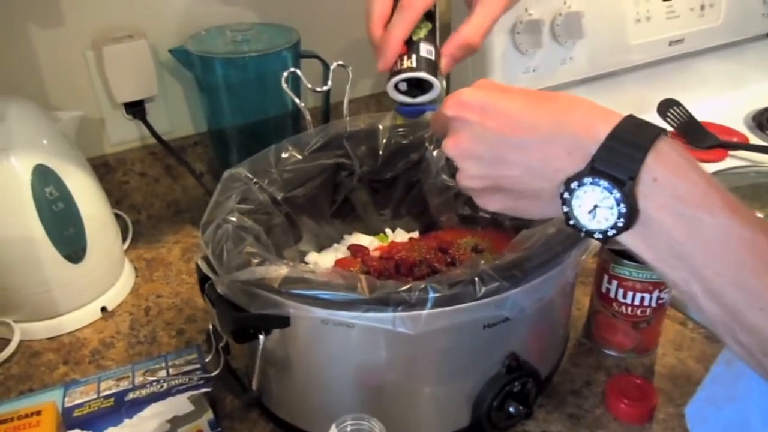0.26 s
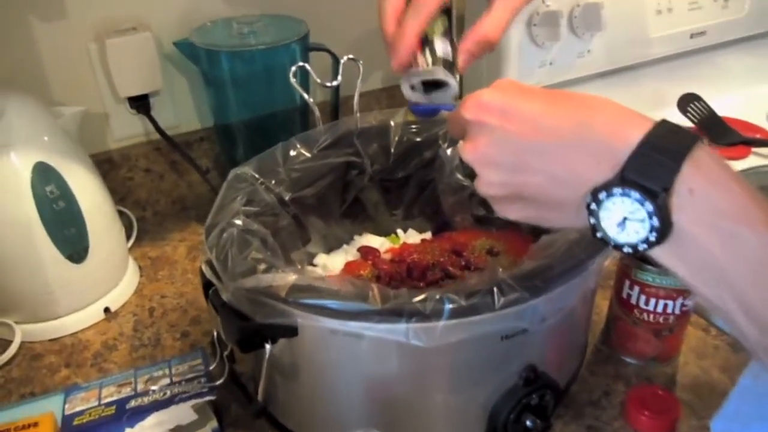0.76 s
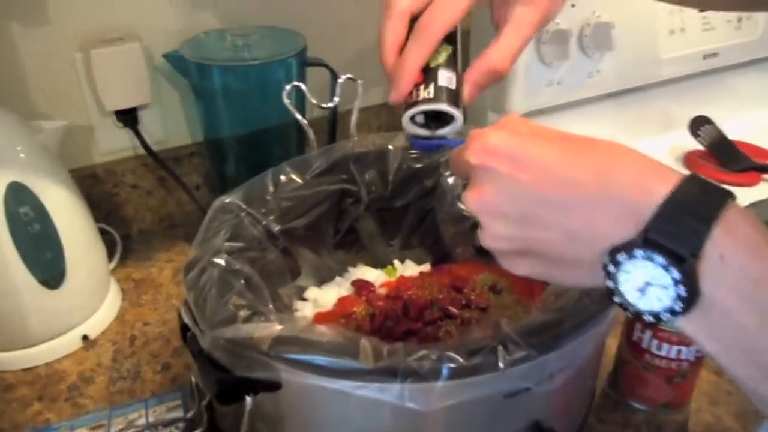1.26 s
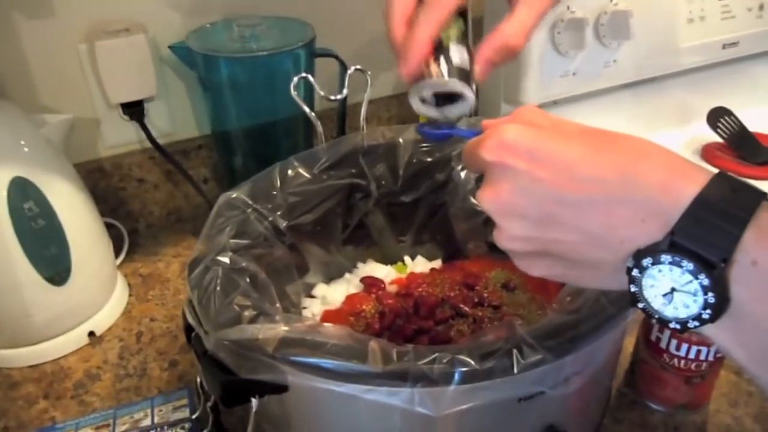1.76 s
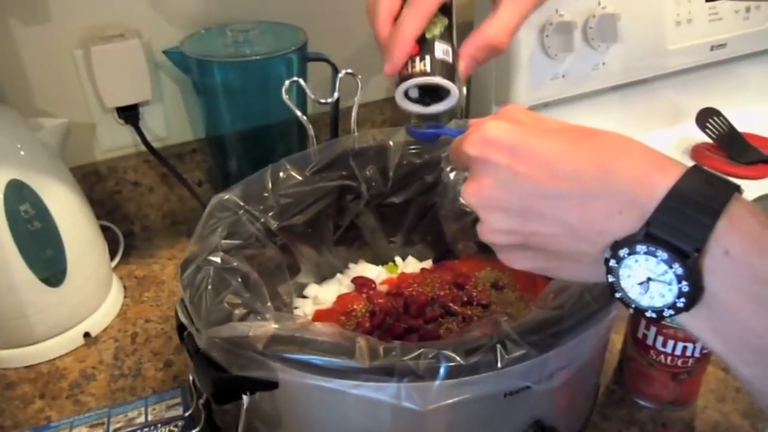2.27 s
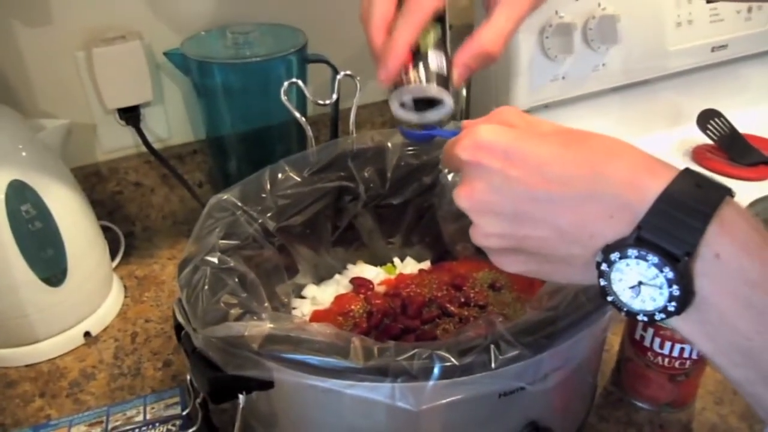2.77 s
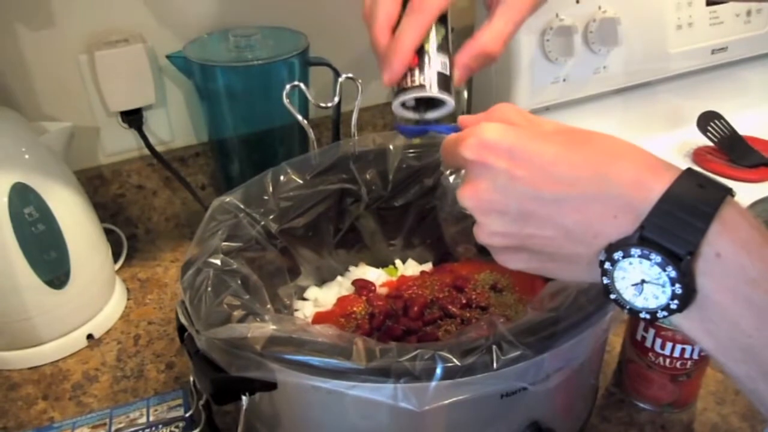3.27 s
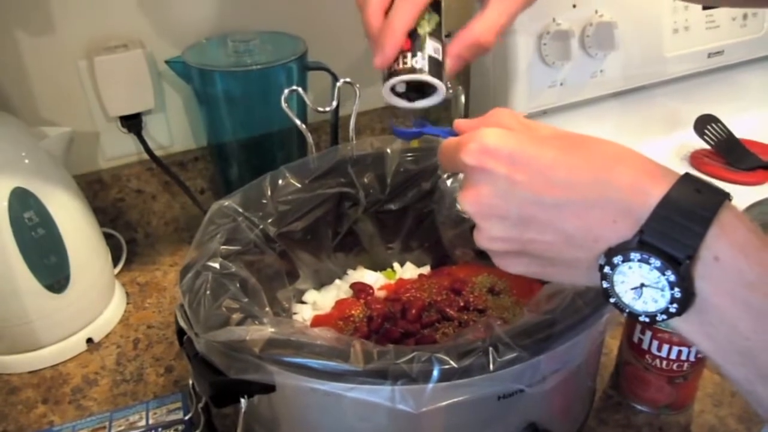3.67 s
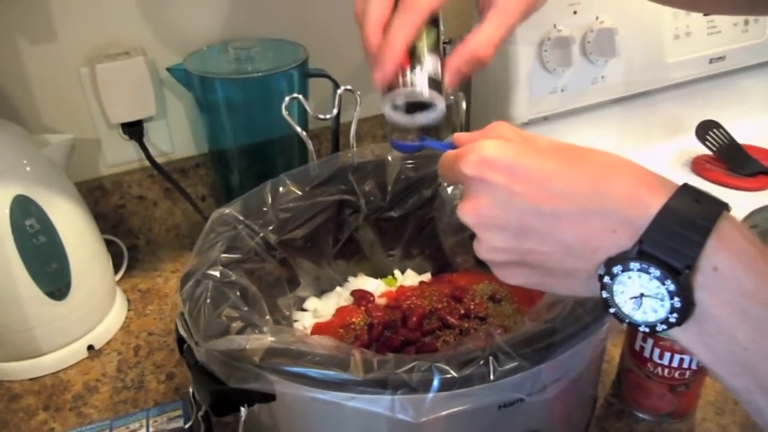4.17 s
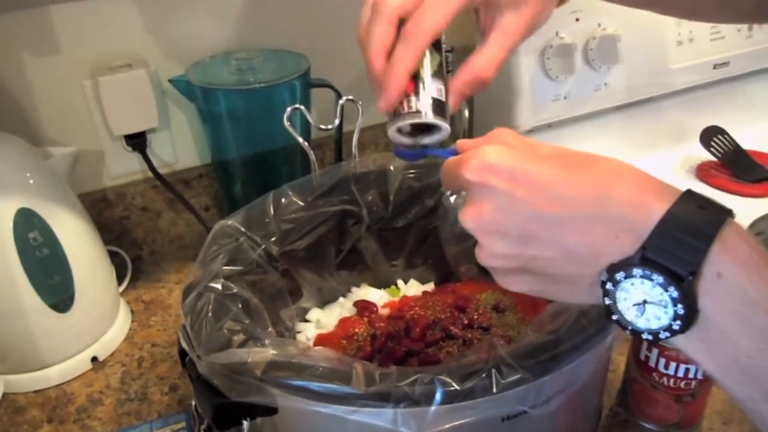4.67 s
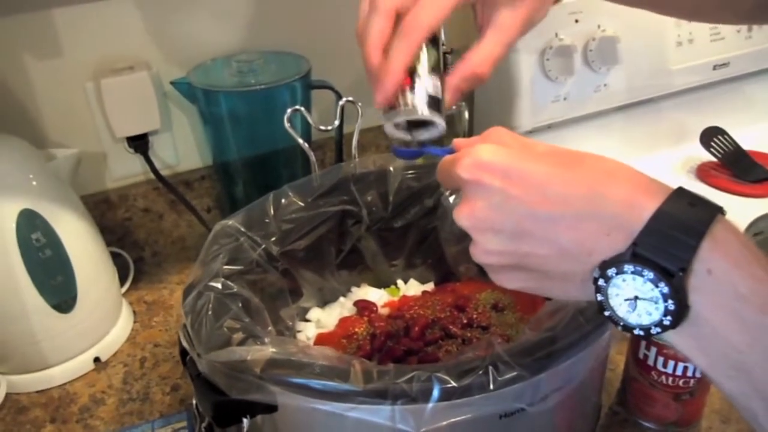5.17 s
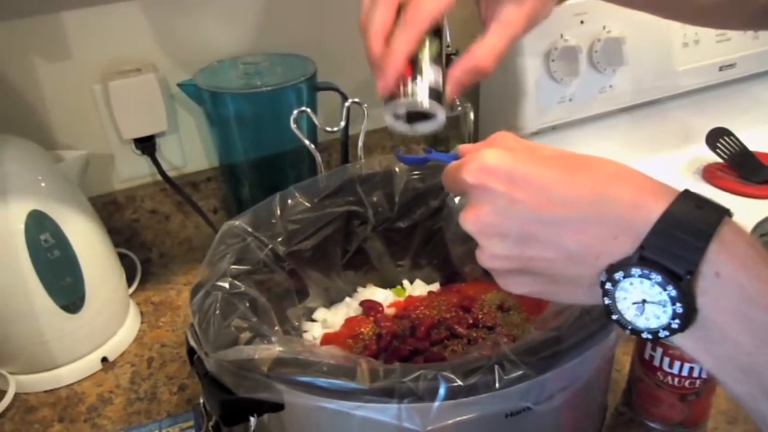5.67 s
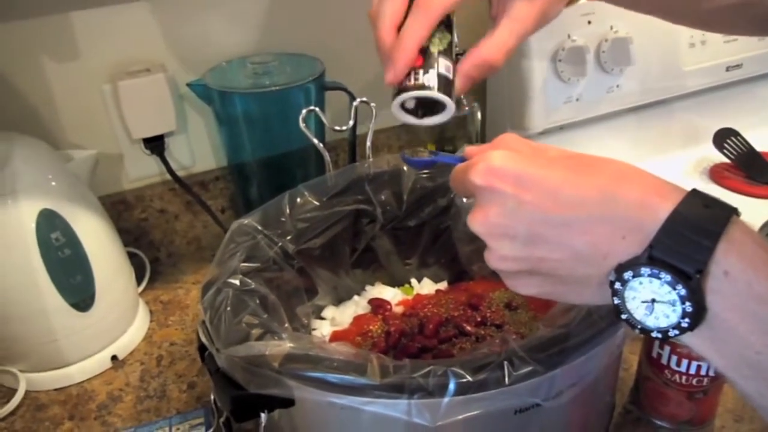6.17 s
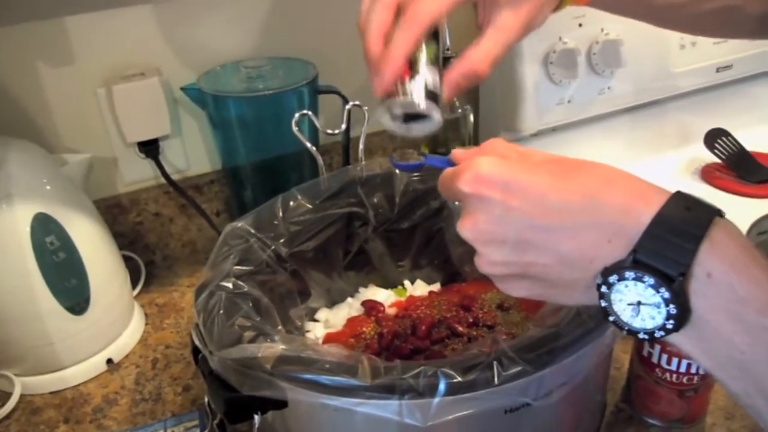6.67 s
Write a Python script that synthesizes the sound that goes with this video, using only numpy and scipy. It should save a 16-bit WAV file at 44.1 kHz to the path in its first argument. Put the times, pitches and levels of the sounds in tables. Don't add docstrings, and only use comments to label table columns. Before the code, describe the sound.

The tail of an earlier tap is just dying at 0 s. A small spice jar then strikes a measuring spoon at 0.1 s, and after a gap, at 0.5 s. From there the taps run evenly, roughly every 0.15 s, until about 4.85 s. They are short, hard, bright clicks with a tiny metallic-glassy ring, an immediate wall reflection and a brief room tail. Strength varies: the loudest falls near 0.95 s, with other strong ones near 2.0 and 3.9 s, and weaker ones after 4.2 s. Their tone grows somewhat brighter from about 3 s. After 4.9 s the tapping stops; only very faint, dry puffs of shifting powder come in irregular shakes until nearly 7 s. Throughout, a low fridge hum, soft broad hiss and a thin, very faint high whine stay steady. Close camera microphone in a small hard kitchen.

```python
import sys
import numpy as np
from scipy import signal
from scipy.io import wavfile

SR = 44100
rng = np.random.default_rng(int(sys.argv[2]) if len(sys.argv) > 2 else 0)


def wav_out(sig):
    wavfile.write(sys.argv[1], SR, np.round(np.clip(np.atleast_2d(sig).T, -1, 1) * 32767).astype(np.int16))


def invert_db(x):
    u = np.asarray(x, float) / 20
    return 10 ** u


N = 304443
LEAD = 4410

# start_s, level_db (peak), flatness_db (lift of the middle pitches)
TAPS = [(0.1098, -7, -3), (0.4981, -13.5, -3), (0.649, -8, -5), (0.7965, -11.5, -2.5), (0.9452, -3, -5),
        (1.1056, -14, -0.5), (1.257, -9, -4), (1.4194, -10, -3.5), (1.58, -13, 1.1), (1.728, -11.5, -1),
        (1.8863, -10.5, 2), (2.0307, -5.5, -0.5), (2.183, -10.5, 0.4), (2.3391, -9.5, -3),
        (2.4993, -10.5, -1), (2.6567, -12.5, -2.5), (2.8171, -12.5, -3.5), (2.9675, -13, -1.8),
        (3.1288, -13, 1.5), (3.2852, -12.5, 4), (3.446, -14, 1), (3.5935, -12, 2.5), (3.7531, -11.5, 2),
        (3.9073, -7, 2.5), (4.0726, -13, 3), (4.2369, -17.5, 4), (4.3927, -16, 3), (4.5456, -14, -1.5),
        (4.6931, -12, 0.7), (4.853, -15, 1.5)]
# level_db, flatness_db
EARLIER_TAP = (-5.5, 0.55)
COLOUR_HZ = [840, 1500, 2600, 4200, 7200, 11500]
# thud_db, low_body_db, shoulder_db, middle_db, upper_db, top_db
TAP_COLOUR = (-24, -23, -21, -15.5, -11.5, -22.5)
# time_s, thud_db, top_db
GRIP = [
    (0, 0, -1.5),
    (.6, 3.5, -3),
    (1.8, 2.5, 0.5),
    (2.5, 2, 0.5),
    (3.2, 1, 1.5),
    (3.9, -22, 1.5),
    (4.9, 9, 2.5),
]
# time_s, level_db (wall echo over straight sound)
FACING = [
    (0, 0),
    (.6, 2),
    (1.1, 2),
    (1.7, 1),
    (2, 0),
    (2.6, -2),
    (3.3, -1),
    (3.6, 1),
    (4.1, 0),
    (4.9, -2),
]
# pitch_hz, level_db, t60_s (time to fall 60 dB)
JAR_RINGS = [(840, -18, 0.0145), (1623, -22, 0.097), (1733, -25.5, 0.091), (1572, -14, 0.084),
             (1987, -8, 0.019), (2157, -25, 0.041), (1510, -12.5, 0.025), (1878, -8, 0.015),
             (2546, -3.5, 0.0076), (3150, -5.5, 0.011), (3210, 1, 0.008), (4120, 4.5, 0.0034),
             (4650, 1, 0.004), (5390, 0, 0.0032), (6280, -5.5, 0.0046), (6980, -5.5, 0.0058),
             (7780, -5, 0.0091), (8710, 1, 0.0055), (9540, -6.5, 0.0076), (10670, -4.5, 0.0072),
             (11380, -1.5, 0.0061), (12870, -5.5, 0.0076), (13900, -42.5, 0.002)]
# pitch_hz, width_hz, level_db
ALL_ROUND = [(1980, 750, 13.5), (3020, 740, 18), (4740, 2150, 15), (5780, 1000, 17.5), (7400, 1430, 13),
             (9720, 1900, 19), (11600, 2400, 17.5)]
# pitch_hz, width_hz, level_db
STRAIGHT = [
    [(2650, 400, -6), (11500, 5000, 3)],
    [(2650, 400, -6), (4700, 2000, 3), (7600, 1800, 8), (12200, 4500, -13)],
]
# pitch_hz, width_hz, level_db
OFF_WALL = [
    [(2200, 250, -6), (3600, 1300, -6), (6100, 400, -7), (7000, 700, 2), (8400, 600, -5), (9400, 700, 9),
     (11800, 3000, 3), (14800, 1500, -9)],
    [(2200, 250, -6), (3300, 900, -7), (6100, 300, -6), (7400, 1500, 11), (8500, 600, -11),
     (13000, 5000, -16)],
]
# pitch_hz, width_hz, level_db
DIFFUSE = [
    [(3670, 960, -0.5), (12700, 2200, -3)],
    [(3800, 3400, -0.5), (7200, 2200, 6), (11800, 7100, -22)],
]
# pitch_hz, width_hz, level_db
ROOM_DIP = [(1960, 160, -6), (1500, 200, -6)]
WALL_MS = [2.25, 2.27]
# delay_ms, left_db, right_db
ECHOES = [
    (3.9, -15, -13),
    (8.9, -16, -14),
    (9.9, -19, -22),
    (13.0, -24, -26),
    (18.5, -18, -21),
]
# pitch_hz, t60_s
ROOM_T60 = [(700, 0.043), (1850, 0.056), (4880, 0.21), (12900, 0.13)]
# pitch_hz, likeness (1 = the same)
ROOM_LIKENESS = [(600, 0.9), (2500, 1), (5000, 0.98), (9000, 0.07)]
# pitch_hz, level_db (per Hz)
HISS = [(14, -0.5), (30, -2), (60, -5), (100, -7), (200, -9), (400, -13.5), (800, -19), (1500, -22),
        (3000, -26.5), (5500, -29), (8000, -27), (11000, -31.5), (14500, -32)]
# pitch_hz, likeness (1 = the same)
HISS_LIKENESS = [(60, 0.94), (130, 0.84), (290, 0.78), (640, 0.39), (1410, 0.4), (3100, -0.14),
                 (6820, 0.056), (15000, 0.0078)]
# pitch_hz, level_db (left over right)
HISS_LEANING = [(300, 0), (1500, -0.5), (2800, -2.5), (4500, 1.5), (7500, -4), (10000, 1), (14000, -1)]
# pitch_hz, width_hz, left_db, right_db
MOTOR = [(121.8, 28, -63.5, -62.5), (30, 35, -63, -65), (801, 46, -67.5, -81), (1384, 154, -72.5, -67.5),
         (2432, 150, -65, -74.5), (2787, 160, -65, -93), (3290, 160, -68, -76), (3700, 240, -69, -70.5),
         (4800, 510, -96, -70.5)]
# sideband (steps of the frame rate), left_db, right_db
WHINE = [(-5, -92, -85), (-3, -84, -76), (-1, -79, -60), (0, -68, -70), (1, -80, -59), (3, -89, -70),
         (5, -92, -77), (7, -94, -80)]
# start_s, level_db (peak)
SHIFTS = [(0.314, -36.5), (0.38, -35), (1.4947, -36.5), (3.519, -36), (5.145, -44), (5.2974, -45),
          (5.6194, -49), (5.7744, -49), (6.1994, -48), (6.238, -42), (6.3994, -49), (6.5594, -56),
          (6.6694, -49), (6.714, -40.5), (6.865, -44)]


def at_hz(points, hz):
    pitch_hz, value = np.array(points).T
    return np.interp(np.log(hz), np.log(pitch_hz), value)


def rms_one(x):
    return x / np.sqrt(np.mean(x ** 2))


def ring(clicks, hz, t60):
    r = invert_db(-60 / (t60 * SR))
    w = 2 * np.pi * hz / SR
    return signal.lfilter([0, np.sin(w)], [1, -2 * r * np.cos(w), r * r], clicks + 1e-18)


def resonance(x, hz, width_hz):
    r = np.exp(-np.pi * width_hz / SR)
    w = 2 * np.pi * hz / SR
    return signal.lfilter([(1 - r * r) / 2, 0, (r * r - 1) / 2], [1, -2 * r * np.cos(w), r * r], x)


def coloured(x, peaks):
    for hz, width_hz, db in peaks:
        x = x + (invert_db(db) - 1) * resonance(x, hz, width_hz)
    return x


def bands(size, likeness):
    white = rng.standard_normal((2, 2, size))
    edges = 14 * 2 ** np.arange(0, 10.4, 1 / 3)
    for k, (low, high) in enumerate(zip(edges, edges[1:])):
        band_pass = signal.butter(2, [low, high], "band", fs=SR, output="sos")
        mid, side = signal.sosfilt(band_pass, white[k % 2])
        centre = np.sqrt(low * high)
        alike = np.clip(at_hz(likeness, centre), -1, 1)
        yield centre, np.sqrt(1 + alike) * mid + np.sqrt(1 - alike) * side * [[1], [-1]]


def quiet_cut(x):
    return signal.sosfilt(signal.ellip(10, .3, 70, 14200, fs=SR, output="sos"), x)


def tap_colours(taps):
    s, peak_db, flat_db = taps.T
    lag_db = 0.55 * (-11.5 - peak_db)
    at_s, thud_db, top_db = np.transpose(GRIP)
    thud_lift = np.interp(s, at_s, thud_db)
    top_lift = np.interp(s, at_s, top_db)
    return np.transpose([thud_lift, lag_db, lag_db / 2, flat_db, 0 * s, top_lift]) + TAP_COLOUR


def jar():
    contact_s, scatter_db = .00004, 1.3
    rung = 240000
    taps = np.array([(-.045, *EARLIER_TAP)] + list(TAPS))
    at = np.round(taps[:, 0] * SR).astype(int) + LEAD
    out = np.zeros((3, N + LEAD))
    wall_db = np.interp(taps[:, 0], *np.transpose(FACING))
    colours = tap_colours(taps)
    scatter = rng.standard_normal((len(taps), 3, len(JAR_RINGS)))

    def strength_db(hz):
        return taps[:, 1] + [np.interp(np.log(hz), np.log(COLOUR_HZ), colour) for colour in colours]

    for k, (hz, db, t60) in enumerate(JAR_RINGS):
        late = at + np.round(np.abs(scatter[:, 2, k]) * contact_s * SR).astype(int)
        level_db = strength_db(hz) + db
        clicks = np.zeros((2 + (t60 > .015), rung))
        clicks[0, late] = invert_db(level_db + scatter_db * scatter[:, 0, k] - wall_db / 2)
        clicks[1, late] = invert_db(level_db + scatter_db * scatter[:, 1, k] + wall_db / 2)
        clicks[2:, at] = invert_db(level_db)
        out[:len(clicks), :rung] += (-1) ** k * ring(clicks, hz, t60)
    for k, (hz, width_hz, db) in enumerate(ALL_ROUND):
        clicks = np.full(rung, 1e-18)
        clicks[at] = invert_db(strength_db(hz) + db)
        out[2, :rung] += (-1) ** k * resonance(clicks, hz, width_hz)
    return invert_db(5) * signal.sosfilt(signal.butter(2, 750, "high", fs=SR, output="sos"), out)


def kitchen():
    t = np.arange(round(.4 * SR)) / SR
    tail = 0
    for hz, band in bands(len(t), ROOM_LIKENESS):
        early = invert_db(-25 - 60 * t / 0.081)
        main = invert_db(-32.5 - 60 * t / at_hz(ROOM_T60, hz))
        late = invert_db(-40.5 - 60 * t / 0.6)
        tail = tail + band * (early + main + late)
    tail = tail * np.clip(t / 0.0025, 0, 1)
    for ms, left_db, right_db in ECHOES:
        tail[:, round(ms * SR / 1000)] += invert_db(np.array([left_db, right_db]))
    return quiet_cut(tail)


def background():
    hiss = 0
    for hz, band in bands(N + SR, HISS_LIKENESS):
        lean_db = at_hz(HISS_LEANING, hz) * np.array([[.5], [-.5]])
        hiss = hiss + invert_db(at_hz(HISS, hz) + lean_db) * band[:, SR:]
    out = invert_db(-48) * rms_one(hiss)
    for hz, width_hz, left_db, right_db in MOTOR:
        hum = resonance(rng.standard_normal(N + SR), hz, width_hz)
        hum = resonance(hum, hz, width_hz)[SR:]
        out += invert_db(np.array([[left_db], [right_db]])) * rms_one(hum)
    return out


def mains_hum():
    return np.sqrt(2) * invert_db(-56.5) * np.sin(2 * np.pi * 120 * np.arange(N) / SR)


def whine():
    line_hz, frame_hz, flip_s = 7867.13, 29.97, .0012
    steady_turn, port_turn = 2.6, 2.75
    t, out = np.arange(N) / SR, 0
    for order, left_db, right_db in WHINE:
        turn = 2 * np.pi * (line_hz * t + order * frame_hz * (t - flip_s))
        turn += np.sign(order) * np.pi / 2 if order else steady_turn
        level = np.sqrt(2) * invert_db(np.array([[left_db], [right_db]]))
        out = out + level * np.cos(turn + [[port_turn], [0]])
    return out


def powder():
    pushes = np.zeros(N + LEAD)
    pushes[[round(s * SR) + LEAD for s, db in SHIFTS]] = invert_db(np.array(SHIFTS)[:, 1] - 39.5)
    rush = signal.oaconvolve(pushes, signal.windows.hann(round(.005 * SR)))[:N + LEAD]
    grains = rng.standard_normal(N + LEAD) * (rng.random(N + LEAD) < .7) * rush
    grains = resonance(grains, 8200, 7100) * invert_db(40.5)
    bright = resonance(grains, 7300, 1800)
    bright = bright - .8 * resonance(grains, 4000, 4000) - .6 * resonance(grains, 9800, 3000)
    return quiet_cut(bright)


def scene():
    powder_db = np.array([[0], [0], [-8]])
    front, back, round_about = jar() + powder() * invert_db(powder_db)
    place = np.repeat(rng.uniform(0, 2 * np.pi, N // 3000 + 3), 3000)[:N + LEAD]
    room_a, room_b = kitchen(), kitchen()
    out = np.zeros((2, N + LEAD))
    for port in range(2):
        out[port] = coloured(front, STRAIGHT[port])
        wall_echo = np.roll(back, round(WALL_MS[port] * SR / 1000))
        out[port] += coloured(wall_echo, OFF_WALL[port])
        wet = signal.oaconvolve(round_about * np.cos(place), room_a[port])
        wet += signal.oaconvolve(round_about * np.sin(place), room_b[port])
        out[port] += coloured(wet[:N + LEAD], DIFFUSE[port] + ROOM_DIP)
    return out[:, LEAD:] + quiet_cut(background()) + mains_hum() + whine()


def top_cut(x):
    return signal.sosfilt(signal.butter(12, 16500, fs=SR, output="sos"), x)


def record(dry):
    top = 1.6
    rounded = top * np.tanh(dry / top)
    mix = signal.sosfilt(signal.butter(10, 14700, fs=SR, output="sos"), rounded)
    return top_cut(mix)


dry = scene()
out = record(dry)
wav_out(out)
```